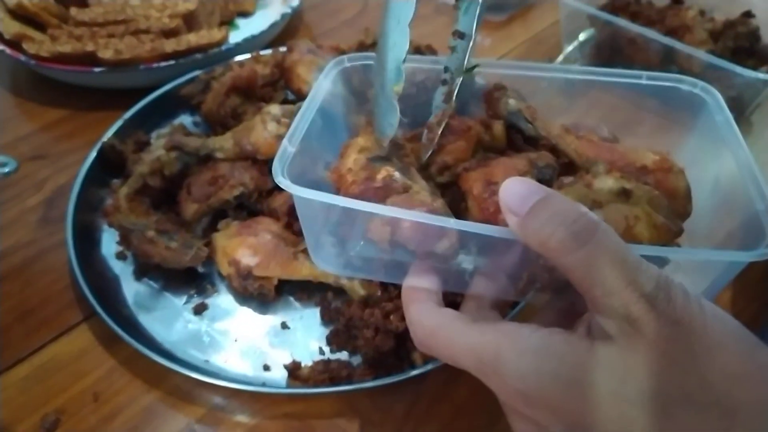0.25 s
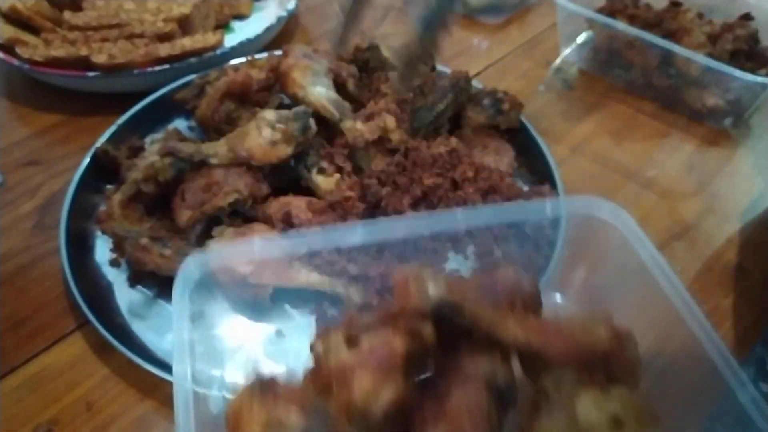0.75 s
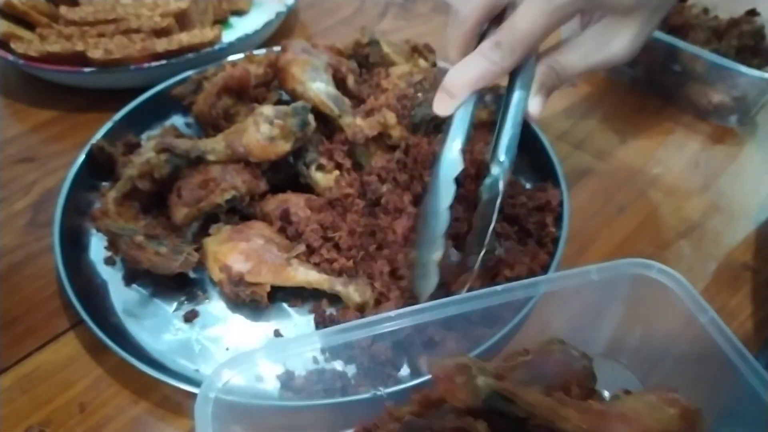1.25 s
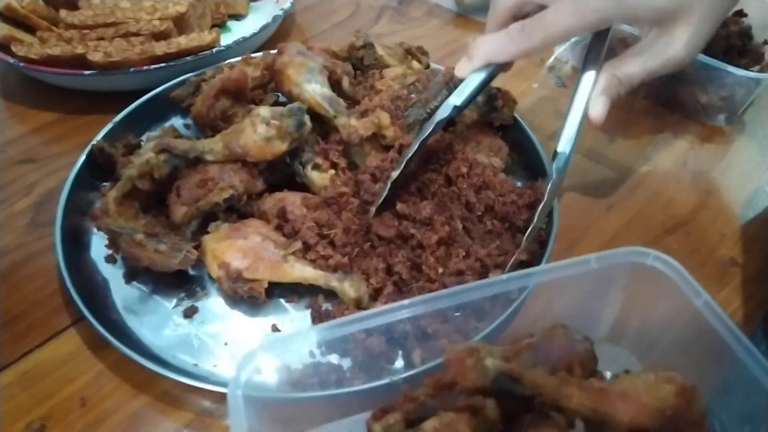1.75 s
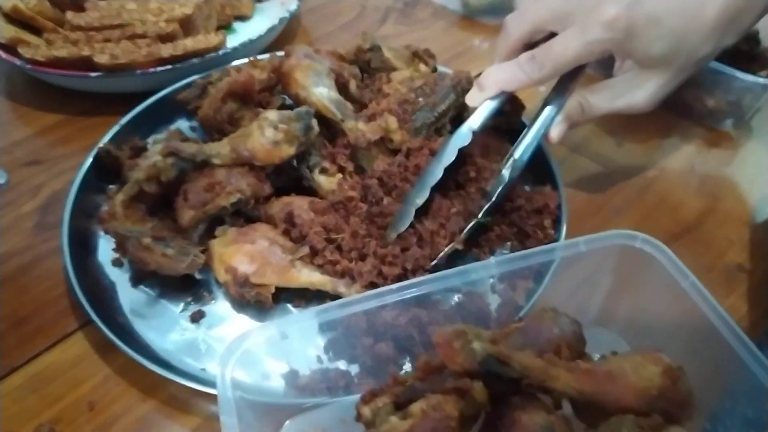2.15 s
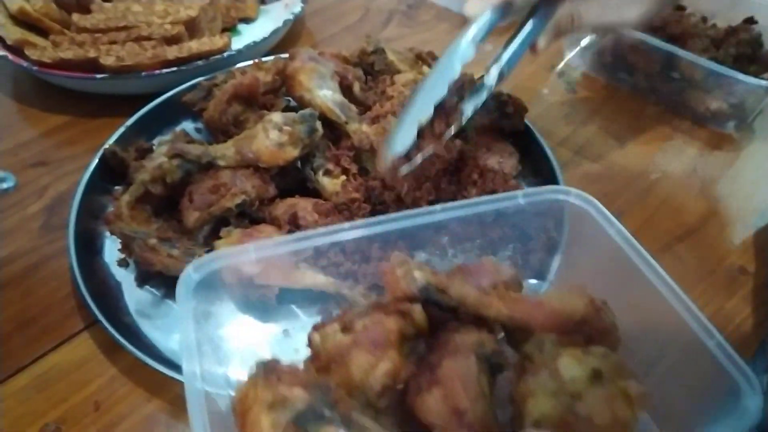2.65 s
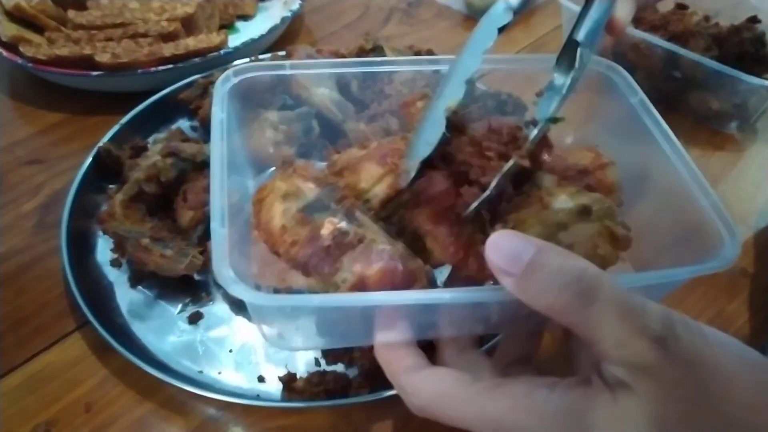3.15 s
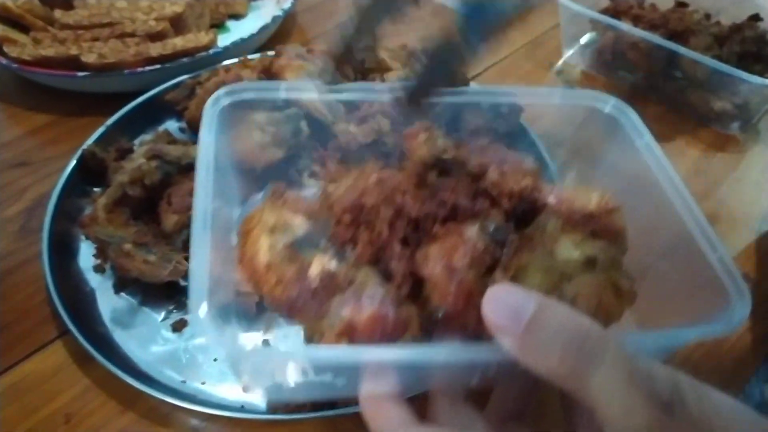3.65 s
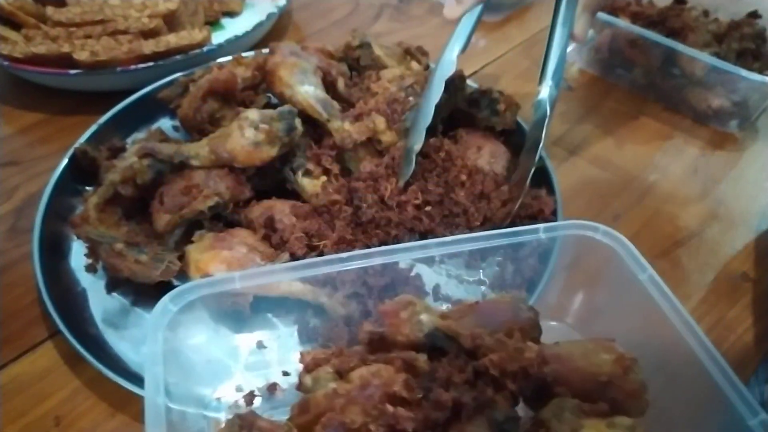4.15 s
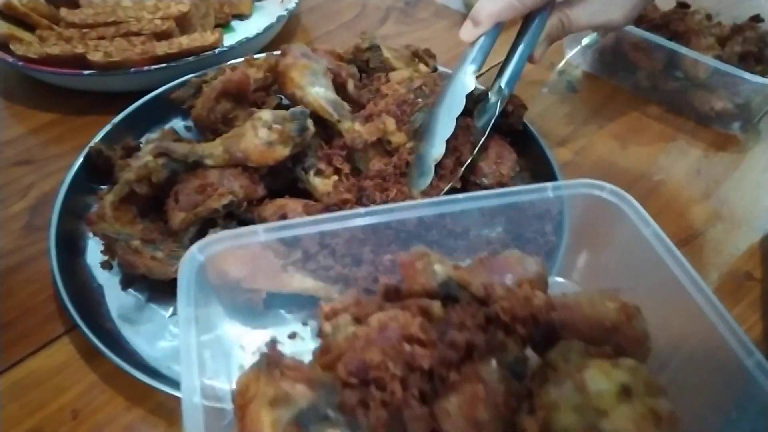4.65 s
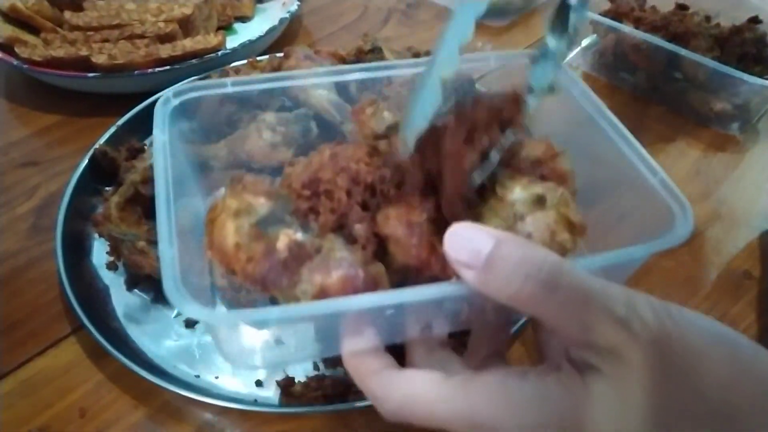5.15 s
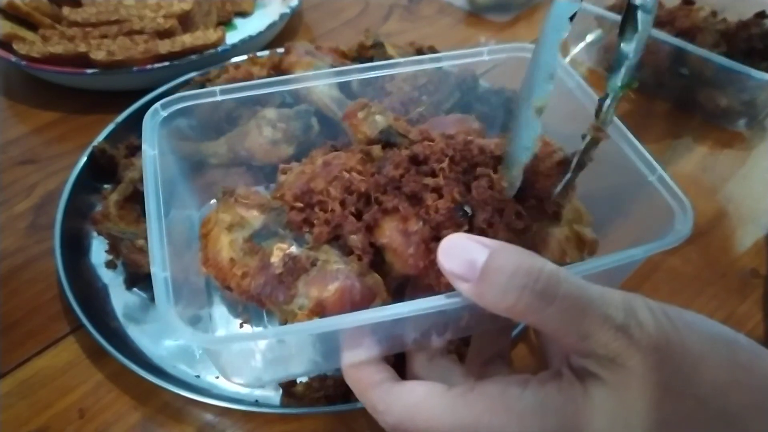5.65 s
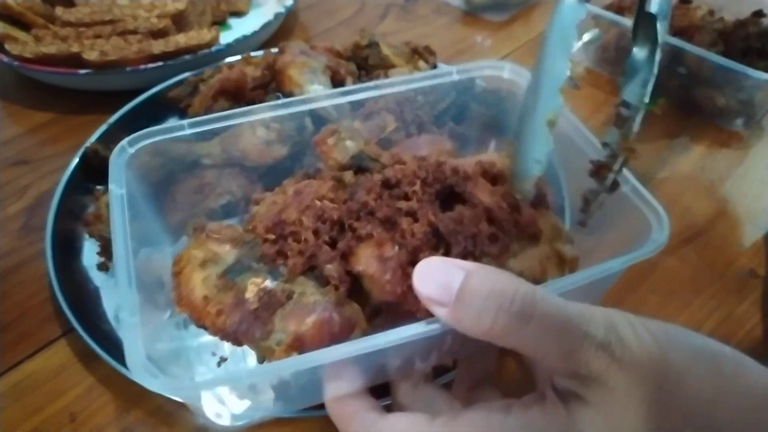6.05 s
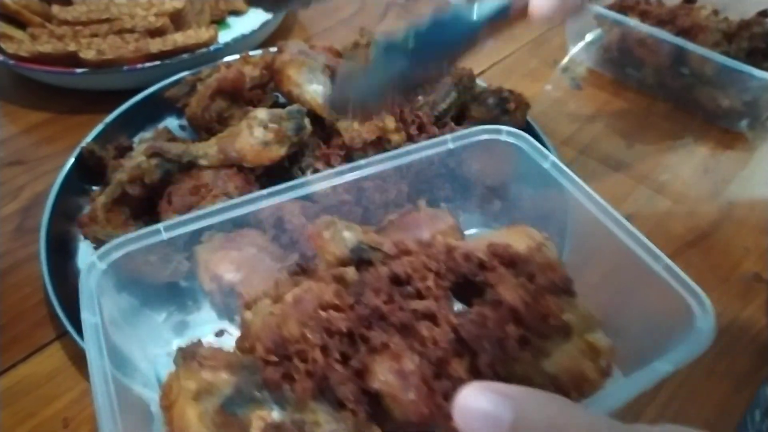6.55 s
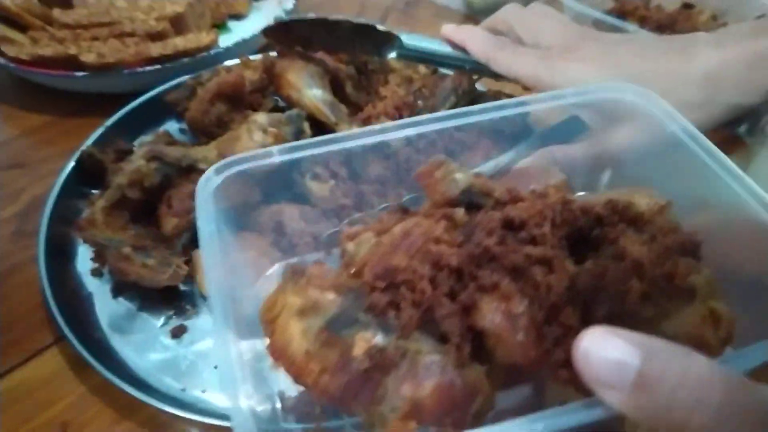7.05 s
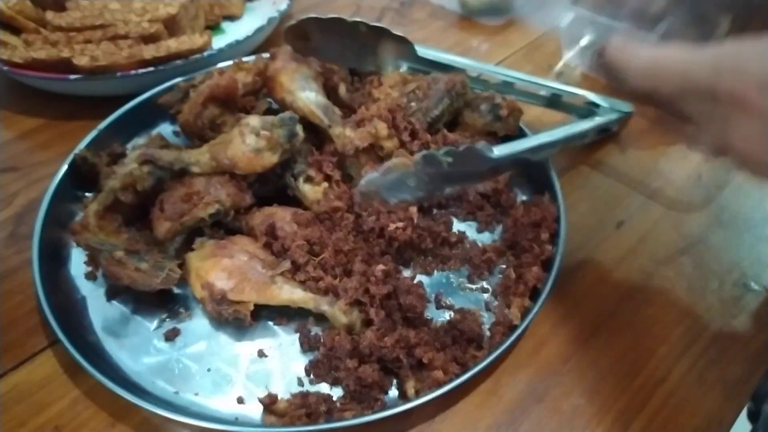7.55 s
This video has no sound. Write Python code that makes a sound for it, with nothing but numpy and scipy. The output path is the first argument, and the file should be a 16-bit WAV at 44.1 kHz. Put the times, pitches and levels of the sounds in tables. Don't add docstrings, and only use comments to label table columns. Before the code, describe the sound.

Steel tongs rake brittle fried crumbs on a metal tray, clack into a thin plastic tub, then drop with a loud ringing crack.

```python
import sys
import numpy as np
from scipy import signal
from scipy.fft import rfft, irfft, next_fast_len
from scipy.io import wavfile
from scipy.ndimage import uniform_filter1d, map_coordinates

SR = 44100
rng = np.random.default_rng(int(sys.argv[2]) if len(sys.argv) > 2 else 0)


def volts_from_decibels(level):
    exponent = np.asarray(level, float) / 20
    return 10 ** exponent


def materialize(psi):
    bounded = np.clip(np.atleast_2d(psi).T, -1, 1)
    quanta = np.round(bounded * 32767).astype(np.int16)
    wavfile.write(sys.argv[1], SR, quanta)


N = 343980


def unit(x):
    return x / np.sqrt(np.mean(x ** 2) + 1e-20)


def along(points, hz):
    point_hz, value = np.transpose(points)
    return np.interp(np.log(hz + 1), np.log(point_hz + 1), value)


def wobble(rate):
    knots = rng.standard_normal(int(N * rate / SR) + 4)
    return map_coordinates(knots, [np.arange(N) * rate / SR])


def rush(spectrum, alike, grain_db=0, grain=30):
    size = next_fast_len(N)
    lumps = unit(uniform_filter1d(rng.standard_normal(N), max(2, int(grain))))
    hz = np.fft.rfftfreq(size, 1 / SR)
    turn = np.arccos(np.clip(along(alike, hz), -1, 1)) / 2
    grains = rng.standard_normal((2, N)) * volts_from_decibels(grain_db * lumps)
    colored = rfft(grains, size) * volts_from_decibels(along(spectrum, hz))
    mid, side = irfft(colored * [np.cos(turn), np.sin(turn)], size)[:, :N]
    return unit(np.array([mid + side, mid - side]))


def add(track, sound, s):
    part = track[:, max(0, round(s * SR)):][:, :sound.shape[1]]
    part += sound[:, :part.shape[1]]


# (frequency [Hz], level [dB per Hz])
AIR_COLOR = [(12, -9), (20, 0.5), (77, -10.5), (107, -7), (130, -19.5), (168, -8.5), (328, -14), (367, -21),
             (527, -20.5), (642, -19.5), (1400, -27), (2320, -27.5), (6010, -35), (9140, -20.5),
             (16000, -54)]
# (frequency [Hz], likeness [-1 to 1])
AIR_LIKENESS = [(30, 0.52), (70, 0.68), (240, 0.81), (950, 0), (3770, 0), (15000, 0.017)]
# (frequency [Hz], level [dB rms])
APPLIANCES = [(2277, -74), (1970, -81.5)]


def air():
    t = np.arange(N) / SR
    whine = np.zeros(N)
    for hz, db in APPLIANCES:
        level_db = db + 0.5 + 2.5 * wobble(4)
        whine += volts_from_decibels(level_db) * np.sin(2 * np.pi * hz * t + 2.15 * wobble(30))
    return volts_from_decibels(-58 + 0.26 * wobble(2.09)) * rush(AIR_COLOR, AIR_LIKENESS) + whine


# (time [s], peak level [dB],
# place [0 tub floor, 1 tub wall, 2 steel on steel])
SHAKING_CONTACTS = [(0.001, -26, .6), (0.011, -31, .6), (0.028, -33, .65), (0.045, -35, .6),
                    (0.064, -33, .6), (0.084, -42, .2), (0.148, -44, 0), (0.169, -45, .3), (0.25, -42, .4),
                    (0.269, -32, .5), (0.309, -45, .1), (0.37, -39, .2), (0.461, -41.5, .1),
                    (0.843, -42, 1.7), (0.879, -45, 1.9), (1.261, -46, 1.5), (2.499, -44, 1.8)]
FIRST_LOAD_CONTACTS = [(3.114, -39.5, 1.4), (3.172, -35.5, 1.37), (3.24, -28, 0.071), (3.247, -31, 0.32),
                       (3.291, -30.5, 2.5), (3.297, -35, 0.1), (3.328, -33.5, 1.2), (3.428, -33, 0.48),
                       (3.502, -38, 0.71), (3.507, -22, 1.1), (3.519, -34, .1), (3.563, -32.5, 1.16),
                       (3.62, -27, 0.63), (3.639, -35, 1), (3.656, -33, 1.14), (3.678, -35.5, 0.89),
                       (3.683, -30.5, 1.16), (3.703, -32.5, 1.2), (3.745, -37, 0.57), (3.763, -28.5, 0.33),
                       (3.827, -33, 1.3), (3.857, -28.5, 1.43), (3.923, -33, 1.7), (4.066, -44.5, 1.3)]
SECOND_LOAD_CONTACTS = [(5.15, -40, 0.46), (5.165, -37.5, 0.19), (5.29, -28, 1.52), (5.295, -41.5, 0.18),
                        (5.352, -22, 1.15), (5.356, -32, 1), (5.384, -39.5, 0.54), (5.407, -30.5, 0.97),
                        (5.424, -51, 0.19), (5.433, -29, 1), (5.441, -27.5, 1.16), (5.456, -34, 1.6),
                        (5.585, -40, 0.84), (5.597, -28, 0.55), (5.68, -48.5, 0.074), (5.714, -37, 0.81),
                        (5.725, -31.5, 0.96), (5.74, -29.5, 1.04), (5.749, -35, 1), (5.8, -35, 1.2),
                        (5.818, -36.5, 0.35), (5.84, -16.5, 0.97), (5.847, -27, 1.8), (5.855, -25, 0.73),
                        (5.878, -30, 1.1), (5.905, -24.5, 1), (5.917, -37, 1.6)]
SHAKING_OFF_CONTACTS = [(6.056, -49.5, 0.13), (6.115, -42.5, 0.33), (6.143, -19, 1.09), (6.161, -29, 0.13),
                        (6.32, -43.5, 0.55), (6.345, -28.5, 0.84), (6.351, -30, 0.58), (6.41, -35.5, 1.24),
                        (6.516, -35, 1.4), (6.552, -36.5, 1.7), (6.681, -40, 1.6), (6.694, -29, 2.5),
                        (6.698, -23.5, 2.3), (6.711, -28, 2), (6.721, -47, 2), (6.739, -36.5, 2.3),
                        (6.746, -33, 2.6), (6.779, -36, 1.85), (6.79, -39, 2.1)]
PUTTING_DOWN_CONTACTS = [(7.121, -42, 1.2), (7.133, -20, 1.5), (7.468, -45, 1.25), (7.553, -32, 1.26),
                         (7.564, -34.5, 1.9), (7.572, -23, 1.9), (7.58, -26.5, 2.3), (7.588, -49, 0.85),
                         (7.693, -36.5, 0.37), (7.713, -34, 2.5), (7.761, -29, 1.18)]
# (contacts, left over right [dB], edge hardness [dB])
WORK = [
    (SHAKING_CONTACTS, 0, 2),
    (FIRST_LOAD_CONTACTS, -1.4, 0),
    (SECOND_LOAD_CONTACTS, -1, 0),
    (SHAKING_OFF_CONTACTS, -1.1, 1.84),
    (PUTTING_DOWN_CONTACTS, 0, 2.2),
]


def contacts():
    rows = []
    for spell, pan_db, hard_db in WORK:
        for s, db, place in spell:
            floor_db = np.interp(place, range(3), [-4, -29, -40])
            wall_db = np.interp(place, range(3), [-5.5, -11.5, -33])
            tick_db = np.interp(place, range(3), np.add([-15.5, -12.5, -6.5], hard_db))
            rows.append((s, db, pan_db, floor_db, wall_db, tick_db))
    return rows


# (low edge [Hz], high edge [Hz], decay t60 [s], level [dB])
MODE_FAMILIES = [(548, 1510, 0.028, 6.5), (1407, 2960, 0.0094, 11), (4080, 7200, 0.011, 3),
                 (7870, 10530, 0.0091, 8), (9800, 15000, 0.0075, -8.5)]
FAMILY_FILTERS = [signal.butter(2, row[:2], "bandpass", fs=SR, output="sos") for row in MODE_FAMILIES]


def clack(levels_db, rise, rattle_db):
    t = np.arange(SR // 8) / SR
    out = np.zeros((2, len(t)))
    for (low_hz, high_hz, t60, db), level_db, band in zip(MODE_FAMILIES, levels_db, FAMILY_FILTERS):
        shared, left, right = rng.standard_normal((3, len(t)))
        burst = shared + 0.55 * np.sqrt(low_hz / 1000) * np.array([left, right])
        decay = volts_from_decibels(-60 * t / t60) + volts_from_decibels(rattle_db - 60 * t / (5 * t60))
        burst *= decay * (1 - np.exp(-t / rise))
        even_width = np.sqrt(SR / (high_hz - low_hz) / 4)
        out += volts_from_decibels(level_db + db) * even_width * signal.sosfilt(band, burst)
    return out


def taps():
    out = np.zeros((2, N))
    for s, db, pan_db, floor_db, wall_db, tick_db in contacts():
        sound = clack([floor_db, wall_db, tick_db, tick_db, tick_db], rise=0.0012, rattle_db=-17)
        side_db = pan_db + 4 * rng.standard_normal()
        add(out, sound * volts_from_decibels(db + side_db * np.array([[.5], [-.5]])), s - .0012)
    return out


def showers():
    power, t = np.zeros((3, N)), np.arange(SR) / SR
    t60 = np.array([[0.63], [1], [0.38]])
    thinning = volts_from_decibels(-60 * t / t60) ** 2
    for s, db, pan_db, floor_db, wall_db, tick_db in contacts():
        grown_db = -36 + 0.35 * (db + 36)
        shower_db = np.add([-25, -39, -35.5], [tick_db, wall_db, floor_db])
        start_db = grown_db + shower_db + 7.5
        add(power, volts_from_decibels(2 * start_db)[:, None] * thinning, s)
    add(power, volts_from_decibels(2 * np.array([-41, -55, -37]))[:, None] * thinning, RIM_HITS[0][0])
    return np.sqrt(power)


def gains(tables):
    t = np.arange(N) / SR
    total = 0
    for rows in tables:
        times, *columns = np.transpose(rows)
        total = total + np.array([volts_from_decibels(np.interp(t, times, db, -150, -150)) for db in columns])
    return total


# (time [s], pace [dB],
# pressure on the tray [dB re pace])
STROKES = [
    [(0, -57, 16), (0.09, -66, 5.5), (0.2, -64.5, -1), (0.3, -63.5, -1), (0.42, -102, 0)],
    [(1.22, -107, -6), (1.266, -54.5, -7), (1.414, -47.5, -2), (1.5, -57.5, -18), (1.56, -71, -8)],
    [(1.72, -65, -15), (1.778, -56, -7), (2.03, -54, -4), (2.362, -51, -9.5), (2.4, -46.5, -9.5),
     (2.544, -59.5, -8.5), (2.7, -87, 1)],
    [(4.09, -69, -4), (4.166, -56, -10.5), (4.32, -50, -3.5), (4.496, -52.5, -8.5), (4.762, -51.5, -14.5),
     (4.88, -67.5, -7)],
    [(5.56, -91, -25), (5.65, -52.5, -14), (5.76, -68, -10), (5.83, -77, -4)],
    [(7.552, -36.5, -15), (7.602, -51, -6), (7.726, -53, 7.5), (7.8, -64, 4)],
]
STROKE_BLADE_DB = [5, -6.5, -2, -3, -9, -4.5]
# (frequency [Hz], level [dB per Hz])
CRACKLE_COLOR = [(2060, -33), (3500, -12), (3730, -12), (5030, -10), (6610, -3), (7090, -8), (8360, 0.5),
                 (9440, 4.5), (14400, -11.5), (16000, -13)]
# (frequency [Hz], level [dB per Hz])
BLADE_COLOR = [(760, -23), (1300, -3.5), (1500, -14.5), (1660, -1.5), (2000, -4), (4500, -9), (5850, -28),
               (9900, -120)]
# (frequency [Hz], level [dB per Hz])
TRAY_COLOR = [(88, -14), (150, -15), (216, -8), (433, -12.5), (472, -13), (510, -8.5), (866, -14),
              (1160, -11), (1500, -21), (1950, -37), (3300, -120)]
# (frequency [Hz], likeness [-1 to 1])
RAKE_LIKENESS = [(60, 0.59), (240, 1), (950, 0.36), (3770, -0.026), (15000, -0.15)]


def crumbs():
    layers = []
    for stroke, blade_db in zip(STROKES, STROKE_BLADE_DB):
        layers.append([(s, db, db + press_db + blade_db, db + press_db) for s, db, press_db in stroke])
    crackle, blade, tray = (showers() + gains(layers)) * volts_from_decibels(0.88 * wobble(25))
    bright = crackle * rush(CRACKLE_COLOR, RAKE_LIKENESS, grain_db=2.0, grain=100)
    bright = bright * volts_from_decibels([[1.2], [-1.2]])
    rubbed = blade * rush(BLADE_COLOR, RAKE_LIKENESS, grain_db=0.5, grain=88)
    drummed = tray * rush(TRAY_COLOR, RAKE_LIKENESS, grain_db=3.5, grain=72)
    return bright + rubbed + drummed


# (start [s], length [s], first pitch [Hz], last pitch [Hz], level [dB])
CALLS = [
    (0.691, .5, 742, 769, -68.5),
    (1.405, 0.3, 711, 568, -61.5),
    (1.948, 0.25, 1183, 1042, -58),
    (2.5, 0.39, 1135, 1178, -70),
    (4.779, 0.29, 688, 574, -61),
    (5.344, 0.3, 610, 652, -60.5),
]


def rooster():
    out, t = np.zeros(N), np.arange(N) / SR
    hoarse, unsteady_db = 1 + 0.0462 * wobble(60), 2.8 * wobble(40)
    for s, length, first_hz, last_hz, db in CALLS:
        pitch = np.interp(t, [s, s + length], [first_hz, last_hz]) * hoarse
        swell_times = s + length * np.array([0, 0.37, 1])
        swell_db = np.interp(t, swell_times, [db - 8, db, db - 8], -150, -150)
        out += volts_from_decibels(swell_db + unsteady_db) * np.sin(2 * np.pi * np.cumsum(pitch) / SR)
    return out


def ring(hz, db, t60, rise):
    t = np.arange(SR // 3) / SR
    hz, db, t60 = (np.asarray(v)[:, None] for v in (hz, db, t60))
    own_phase, own_db = rng.standard_normal((2, 2, len(hz), 1))
    phase = rng.uniform(0, 2 * np.pi, hz.shape) + own_phase * 1.03 * np.sqrt(hz / 1000)
    modes = volts_from_decibels(db + 0.56 * own_db - 60 * t / t60) * np.sin(2 * np.pi * hz * t + phase)
    return modes.sum(1) * (1 - np.exp(-t / rise))


# (time [s], level [dB])
TABLE_BLOWS = [
    (6.144, -51.5),
    (7.11, -38),
    (7.553, -29.5),
    (7.565, -32),
    (7.605, -39),
    (7.633, -41),
    (7.656, -43),
]
# (frequency [Hz], level [dB], decay t60 [s])
TABLE_MODES = [(78, -15.5, 0.37), (99.7, -19.5, 0.55), (155, -13, 0.2), (209.3, -3.5, 0.12),
               (327.3, -2, 0.13), (392, 0, 0.064), (532, -3, 0.14), (630, 6, 0.04), (732, -2, 0.15),
               (823, 0.5, 0.058), (920, -3, 0.056)]


def table():
    out, t = np.zeros((2, N)), np.arange(SR // 5) / SR
    wood = signal.butter(2, [170, 1000], "bandpass", fs=SR, output="sos")
    for s, db in TABLE_BLOWS:
        add(out, volts_from_decibels(db) * ring(*np.transpose(TABLE_MODES), rise=0.00085), s - .001)
        shared, left, right = rng.standard_normal((3, len(t)))
        thud = signal.sosfilt(wood, shared + 0.72 * np.array([left, right]))
        add(out, volts_from_decibels(db + 7 - 60 * t / 0.13) * thud, s - .001)
    return out


# (time [s], peak level [dB])
RIM_HITS = [
    (7.107, -6),
    (7.121, -21),
    (7.132, -20),
]
# (frequency [Hz], level [dB], decay t60 [s])
STEEL_MODES = [(1813, 6.5, 0.19), (2830, 14, 0.025), (3280, -25, 0.12), (3550, -26, 0.081),
               (4010, -7, 0.092), (5000, -14, 0.14), (5400, -15, 0.18), (5443, -44, 5.0), (6050, -8, 0.13),
               (6770, -2, 0.27), (8200, -2.5, 0.079), (9500, -14, 0.25), (10240, -2, 0.15),
               (13300, -16, 0.11), (14850, -24, 0.25)]


def drop():
    out = np.zeros((2, N))
    hz, level_db, t60 = np.transpose(STEEL_MODES)
    for s, db in RIM_HITS:
        crack = clack([-56, -12.0, -19, -10.5, -1.0], rise=0.0024, rattle_db=-18)
        add(out, volts_from_decibels(db) * crack, s - .0015)
        ringing = ring(hz, level_db, np.minimum(t60, .055), rise=0.00086)
        add(out, volts_from_decibels(db - 19.5) * ringing, s - .001)
    return out


# (frequency [Hz], decay t60 [s])
KITCHEN_DECAY = [(200, 0.99), (2000, 0.58), (10000, 0.49)]


def kitchen(x):
    out, step = np.zeros((2, N)), SR // 3
    for start in range(0, N, step):
        hz, t, z = signal.stft(rng.standard_normal((2, SR // 2)), SR, nperseg=256)
        dying = z * volts_from_decibels(-60 * t / along(KITCHEN_DECAY, hz)[:, None])
        tail = signal.istft(dying, SR, nperseg=256)[1]
        tail = tail / np.linalg.norm(tail[0])
        add(out, signal.fftconvolve(x[None, start:start + step], tail, axes=1), start / SR + .003)
    return out


def scene():
    hits = taps() + drop() + table()
    rubbing, far = crumbs(), rooster()
    near = hits + rubbing
    near[0] = np.roll(near[0], 3)
    sent = volts_from_decibels(-9.0) * hits.mean(0) + volts_from_decibels(-12.5) * rubbing.mean(0) + far
    return near + kitchen(sent) + 0.67 * far + air()


def roll_off(x):
    return signal.sosfilt(signal.butter(12, 16560, fs=SR, output="sos"), x)


def record(dry):
    band_limit = signal.cheby2(12, 60, 17000, fs=SR, output="sos")
    narrow = signal.sosfiltfilt(band_limit, dry)
    return roll_off(narrow)


dry = scene()
out = record(dry)
materialize(out)
```